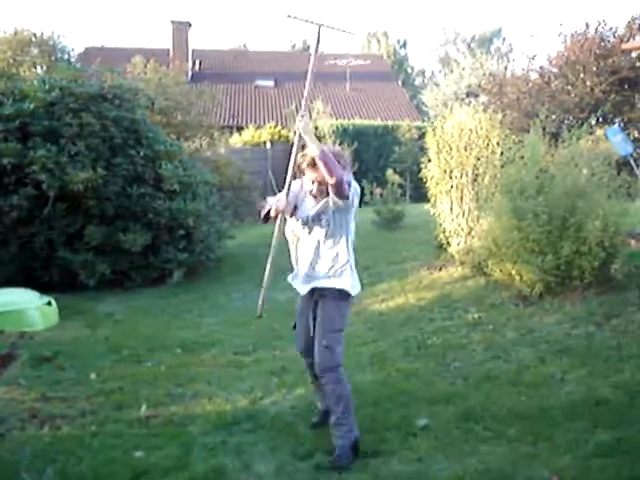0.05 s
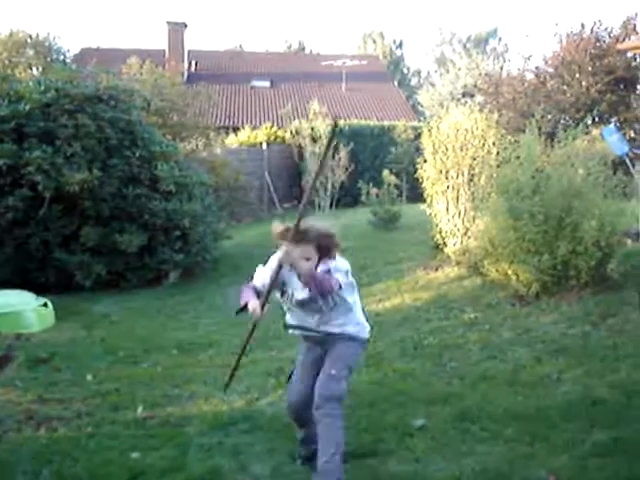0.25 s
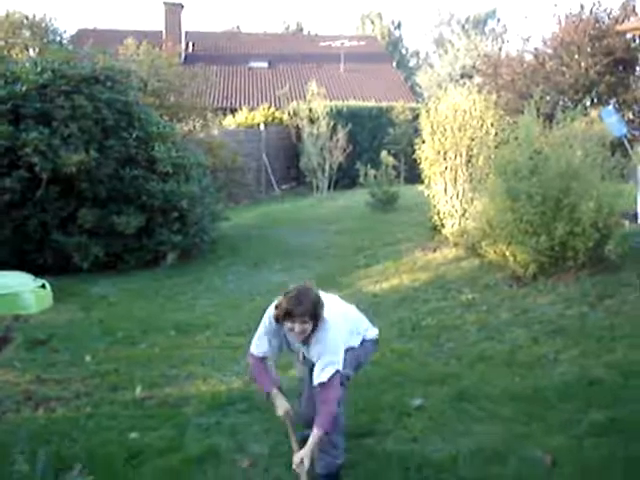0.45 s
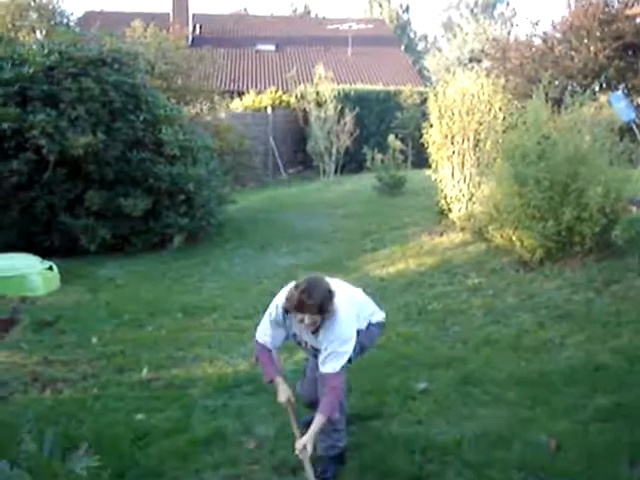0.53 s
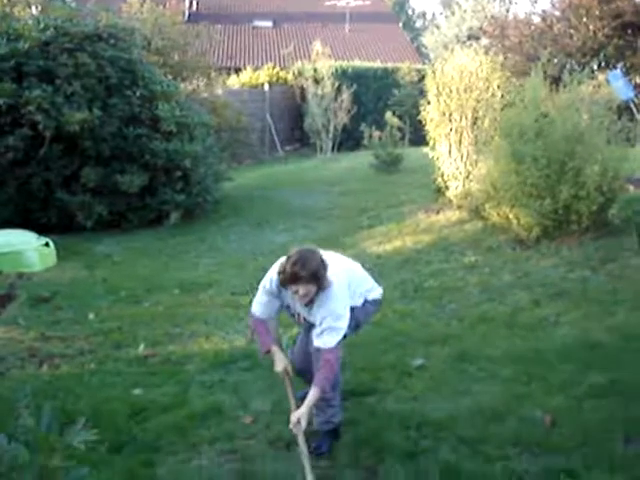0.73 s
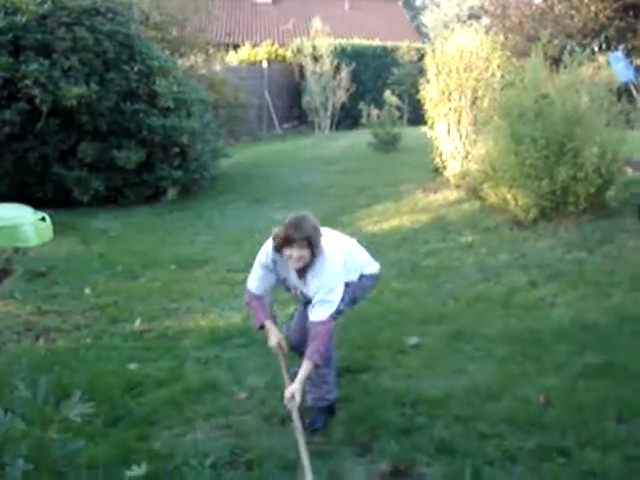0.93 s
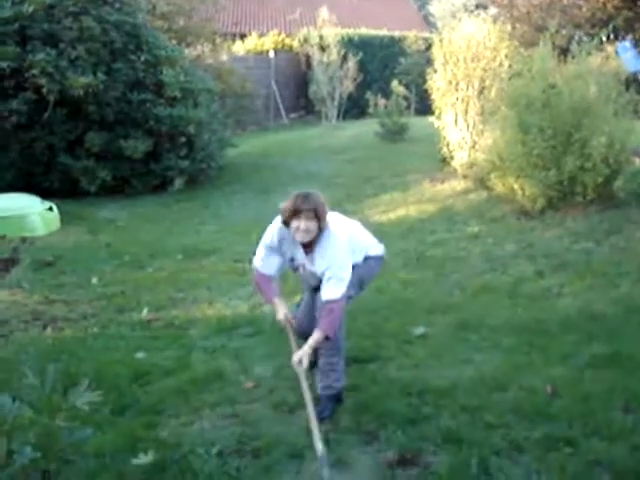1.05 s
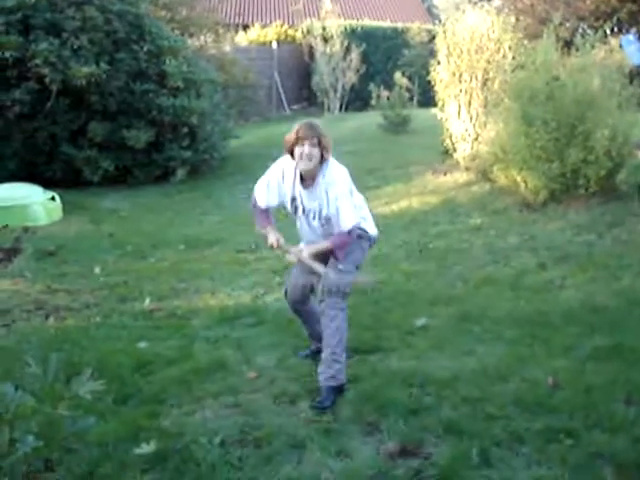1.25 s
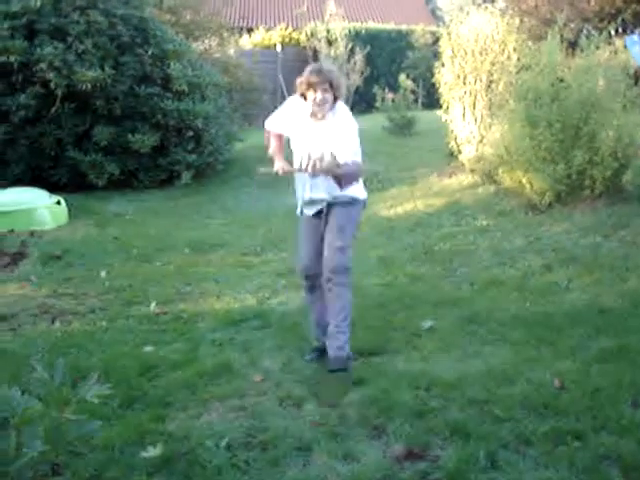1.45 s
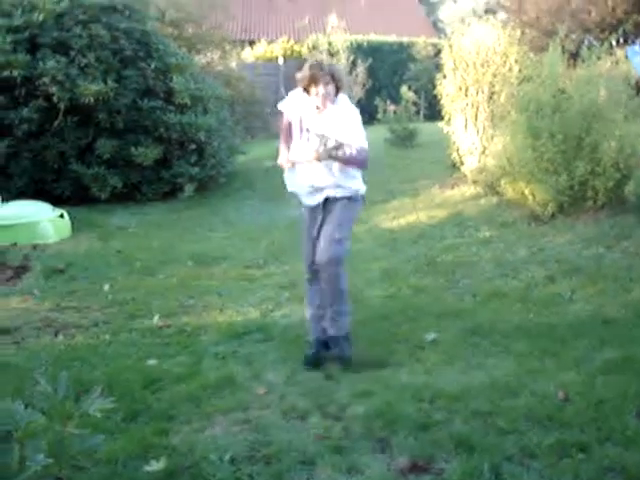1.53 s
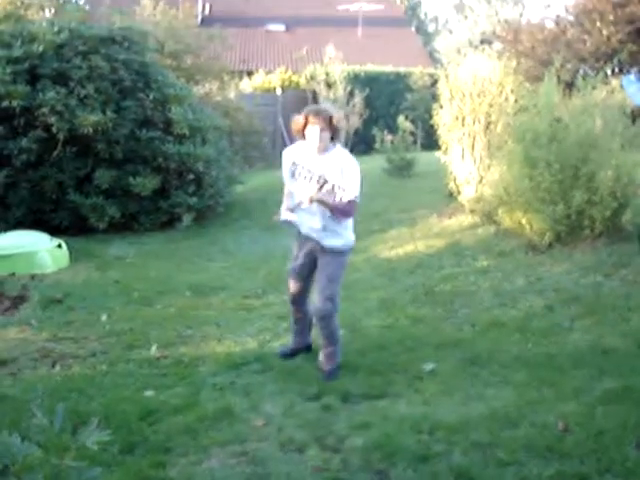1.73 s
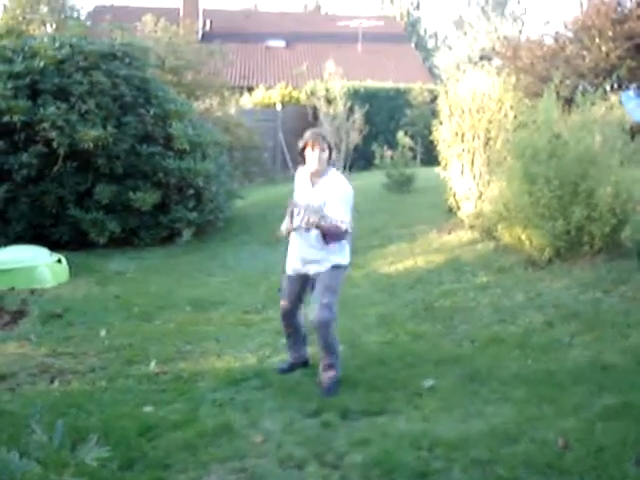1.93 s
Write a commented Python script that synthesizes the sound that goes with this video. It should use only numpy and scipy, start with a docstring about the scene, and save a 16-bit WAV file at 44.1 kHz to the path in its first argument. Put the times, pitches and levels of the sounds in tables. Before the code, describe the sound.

A rake hits the lawn with a sharp crack just after a dull foot stamp.

```python
"""Rake strike on a garden lawn

Near the microphone a foot stamps with a dull thud, then a long rake hits the ground with a rattling
crack of tines. Grass and clothes rustle as it is lifted and the feet shuffle back; traffic is a far hush.
The small camera whistles faintly, and its gain control ducks at the crack and recovers."""
import sys
import numpy as np
from scipy import signal
from scipy.fft import rfft, irfft, next_fast_len
from scipy.io import wavfile
from scipy.ndimage import uniform_filter1d, map_coordinates

SR = 44100
rng = np.random.default_rng(int(sys.argv[2]) if len(sys.argv) > 2 else 0)


def waveform_to_disk(signal):
    """Save audio, clipped to [-1, 1], as 16-bit WAV at the path in sys.argv[1]."""
    frames = np.transpose(np.atleast_2d(signal))
    scaled = np.clip(frames, -1, 1) * 32767
    samples = np.round(scaled).astype(np.int16)
    wavfile.write(sys.argv[1], SR, samples)


N = 88200
TOP_HZ = 10020  # upper edge of the camera's band

# Colour of a shoe's scuff and of the hedges' scatter. Each row: frequency in Hz, relative level in dB.
SCUFF_SPECTRUM = [(40, -15), (120, -8), (400, -3), (1000, -1.5), (2000, -7), (5000, -14.5), (10000, -19)]


def amp(db):
    return 10 ** (np.asarray(db) / 20)


def unit(x):
    """x at rms 1."""
    return x / np.sqrt(np.mean(x ** 2) + 1e-20)


def since(start):
    """Seconds since start, for every sample."""
    return np.arange(N) / SR - start


def filtered(x, response):
    """x through a filter whose gain is response(Hz)."""
    size = next_fast_len(N + SR // 2)
    return irfft(rfft(x, size) * response(np.fft.rfftfreq(size, 1 / SR)), size)[:N]


def noise(spectrum):
    """Noise of rms 1 below TOP_HZ, coloured by (Hz, dB) points."""
    hz, db = np.transpose(spectrum)
    white = rng.standard_normal(N)
    return unit(filtered(white, lambda f: amp(np.interp(np.log(f + 1), np.log(hz), db)) * (f < TOP_HZ)))


def wobble(rate):
    """A smooth random curve, rate knots a second."""
    return map_coordinates(rng.standard_normal(N // 8), [np.arange(N) * rate / SR], mode="wrap")


def decay(start, decay_s):
    """A sudden onset and an exponential fall."""
    t = since(start)
    return (t >= 0) * np.exp(-np.abs(t) / decay_s)


def traffic():
    """Far-off traffic reaches the lawn as a nearly steady hush."""
    # Traffic and hiss. Each row: frequency in Hz, relative level in dB.
    hush_spectrum = [(15, -22.5), (30, -9), (60, -11), (140, -10.5), (330, -6.5), (420, -6.5), (570, -2),
                     (780, -3), (1030, 1), (1400, -7.5), (2000, -16), (2700, -22.5), (4000, -23.5),
                     (5600, -26), (8400, -26.5), (10000, -29)]
    hush = noise(hush_spectrum)
    sway_db, flutter_db = -0.43 * wobble(3.04), 0.5 * wobble(25.02)
    return hush * amp(-46.5 + sway_db + flutter_db)


def camera_whistle():
    """A thin, unsteady electronic tone inside the camera keeps darting up from its resting pitch."""
    # The highest darts. Each row: time of peak in seconds, pitch rise in Hz.
    darts = [(.68, 648), (.85, 1150), (.91, 554), (1.18, 649), (1.215, 1350), (1.52, 795), (1.58, 948),
             (1.645, 653), (1.68, 651), (1.92, 1322)]
    rest_hz, dart_width_s = 3300, 0.009
    hz = rest_hz + 230 * np.logaddexp(0, 2 * wobble(85))  # wanders upward only
    hz += sum(rise * np.exp(-(since(peak) / dart_width_s) ** 2 / 2) for peak, rise in darts)
    hz += 140 * wobble(900)  # fast jitter
    flicker = amp(2.5 * wobble(85))
    return amp(-63.7) * unit(flicker * np.sin(2 * np.pi * np.cumsum(hz) / SR))


def rustle():
    """Grass and cloth rub in grainy swishes, and a few stems snap underfoot."""
    # Each row: time of peak in seconds, level in dB, rise and fall times in seconds.
    swishes = [(0.016, -52, 0.023, 0.025), (.085, -49, 0.022, 0.03), (.18, -56, .03, 0.04),
               (.258, -44.5, 0.022, 0.073), (.40, -51.5, 0.06, 0.038), (.552, -42.5, 0.0034, 0.042),
               (.695, -45, 0.0093, 0.0093), (1.085, -59, 0.015, 0.023), (1.481, -54, .012, 0.024),
               (1.60, -58.5, 0.044, 0.089), (1.84, -48.3, .06, .035)]
    # Colour of the rustle. Each row: frequency in Hz, relative level in dB.
    grass_spectrum = [(150, -7), (400, 1), (1200, -2.5), (2500, -2.5), (4500, -2.5), (7000, -5.5),
                      (9500, -5)]
    # Each row: start in seconds, level in dB.
    stem_snaps = [(.3805, -46), (0.414, -38.5), (1.8533, -35.5), (1.868, -33), (1.876, -36), (1.935, -42)]
    power = np.zeros(N)
    for peak, db, rise, fall in swishes:
        t = since(peak)
        envelope = np.where(t < 0, np.exp(-(t / rise) ** 2 / 2), np.exp(-np.abs(t) / fall))
        power += (amp(db) * envelope) ** 2
    grains = unit(noise(grass_spectrum) * amp(4.5 * wobble(rate=700)))
    snaps = sum(amp(db) * decay(start, decay_s=0.001) for start, db in stem_snaps)
    return np.sqrt(power) * grains + snaps * noise(grass_spectrum)


def footfalls():
    """Each step swells the turf through a couple of low cycles and scuffs the grass."""
    # Each row: start in seconds, thud level in dB, scuff level in dB.
    steps = [(.2482, -14.5, -30.5), (0.3048, -43, -38)]
    # Turf under a shoe. Each row: frequency in Hz, relative level in dB, swell time in seconds.
    turf_modes = [(259.5, 1, 0.0036), (561, -11, 0.0041)]
    scuff_delay_s, scuff_rise_s, scuff_fall_s = 0.002, 0.0039, 0.005
    low_cut_hz = 113  # keeps the thud free of deep rumble
    thuds, scuffs = np.zeros(N), np.zeros(N)
    for start, thud_db, scuff_db in steps:
        t = np.maximum(since(start), 0)
        for hz, db, swell in turf_modes:
            envelope = (t / swell * np.exp(1 - t / swell)) ** 4
            thuds += amp(thud_db + db) * envelope * np.sin(2 * np.pi * hz * t)
        t = since(start + scuff_delay_s)
        scuffs += amp(scuff_db) * np.exp(-np.abs(t) / np.where(t < 0, scuff_rise_s, scuff_fall_s))
    thuds = filtered(thuds, lambda f: f ** 2 / np.hypot(f ** 2, low_cut_hz ** 2))
    return thuds + scuffs * noise(SCUFF_SPECTRUM)


def garden_reflections(x):
    """One echo from a nearby house wall and a weak scatter from the hedges return to the microphone."""
    wall_delay_s, hedge_t60_s = 0.0245, 0.29
    tail = noise(SCUFF_SPECTRUM) * decay(0, hedge_t60_s / np.log(1000))
    tail /= np.linalg.norm(tail)
    echo = filtered(x, lambda f: np.exp(-2j * np.pi * f * wall_delay_s))
    return amp(-17) * echo + amp(-21.5) * signal.fftconvolve(x, tail)[:N]


def rake_strike():
    """The tines brush the grass, land in quick succession and ring briefly, and then the sound stops abruptly."""
    # The rake head meets the ground. Each row: start in seconds, level in dB, decay time in seconds.
    contacts = [(.5068, -18.5, .0019), (0.51, -16, .0068), (0.5225, -25, 0.0031)]
    # Each row: frequency in Hz, relative level in dB, seconds to fall 60 dB if left to ring.
    tine_modes = [(2174, -3, 0.13), (2680, -2.5, 0.054), (3660, 2.5, 0.082), (4160, 0, 0.09),
                  (4830, 1.5, .07), (5200, 0, 0.076), (5790, -7, .06), (8080, 1, 0.043), (9650, -1, .06)]
    # Colour of the blows. Each row: frequency in Hz, relative level in dB.
    crack_spectrum = [(100, -1), (400, 2), (900, -3.5), (1400, -9.5), (1800, -2.5), (2500, -1),
                      (3000, -3.5), (4200, 1), (7000, -6.5), (9700, -1)]
    landing_s, click_s, cutoff_s = contacts[0][0], 0.5229, 0.5255
    t = since(landing_s)
    brush = amp(-28) * np.exp(-np.abs(t) / 0.00098)
    blows = sum(amp(db) * decay(start, decay_s) for start, db, decay_s in contacts)
    crack = (brush + blows) * noise(crack_spectrum)
    ring = np.zeros(N)
    for hz, db, t60 in tine_modes:
        envelope = amp(db) * decay(landing_s, t60 / np.log(1000))
        ring += envelope * np.sin(2 * np.pi * (hz * t + rng.random()))
    ring *= amp(-22.5) * (1 - decay(landing_s, 0.0022))  # builds over a few milliseconds
    hard_click = amp(-2) * decay(click_s, 0.0001) * np.sin(2 * np.pi * 8000 * since(click_s))
    cutoff = np.exp(-np.maximum(since(cutoff_s), 0) / 0.0008)
    pressure_swing = -amp(-26) * decay(landing_s, 0.052) * np.cos(2 * np.pi * 5.8 * t)
    return (crack + ring + hard_click) * cutoff + pressure_swing


def sizzle():
    """A faint, narrow hiss high in the treble comes and goes once."""
    # Each row: frequency in Hz, relative level in dB.
    sizzle_spectrum = [(6500, -37), (7900, -12), (8400, 2), (8900, -9), (10000, -9)]
    peak_s, width_s = 1.088, 0.023
    return amp(-61) * noise(sizzle_spectrum) * np.exp(-(since(peak_s) / width_s) ** 2 / 2)


def scene():
    """The lawn in mono: steps with their reflections, rake and rustle close by, traffic far behind."""
    steps = footfalls()
    return (steps + garden_reflections(steps) + rake_strike() + rustle() + traffic() + sizzle())[None]


def record(dry):
    """The camera ducks its gain on loud treble and recovers, adds its whistle and limits the band."""
    sense_hz, threshold_db, window_s, release_s = 1500, -27.5, 0.009, 0.13
    mic = dry[0]
    treble = filtered(mic, lambda f: f / np.hypot(f, sense_hz))
    power = np.abs(uniform_filter1d(treble ** 2, int(window_s * SR)))
    excess_db = np.maximum(10 * np.log10(power + 1e-12) - threshold_db, 0)
    release = np.exp(-since(0) / release_s)
    duck_db = np.maximum.accumulate(excess_db / release) * release  # ducks at once, lets go slowly
    track = mic * amp(-duck_db) + camera_whistle()
    return filtered(track, lambda f: 1 / np.sqrt(1 + (f / TOP_HZ) ** 300))[None]


dry = scene()
out = record(dry)
waveform_to_disk(out)
```